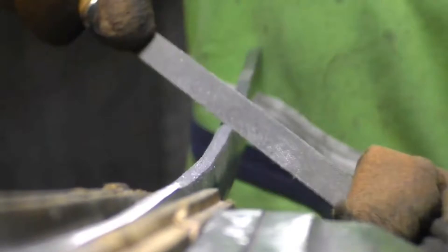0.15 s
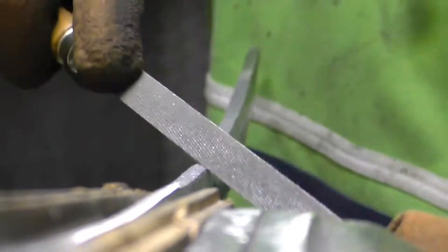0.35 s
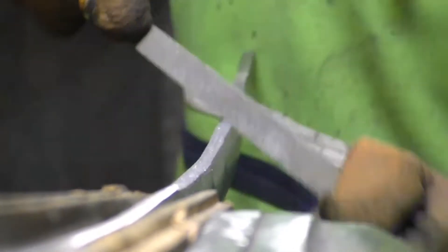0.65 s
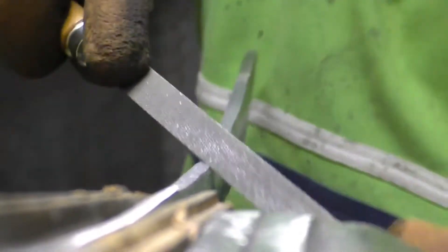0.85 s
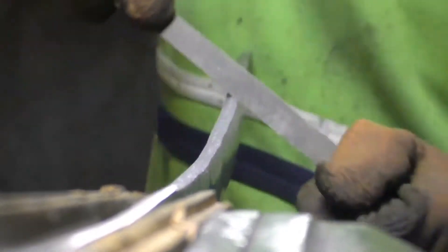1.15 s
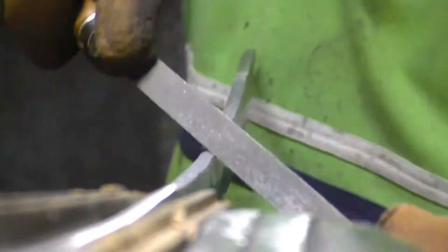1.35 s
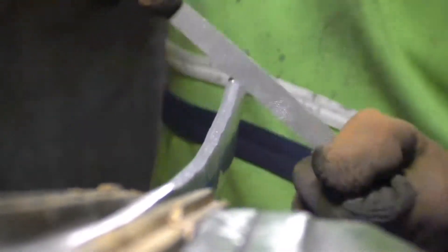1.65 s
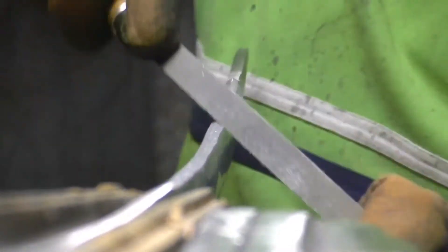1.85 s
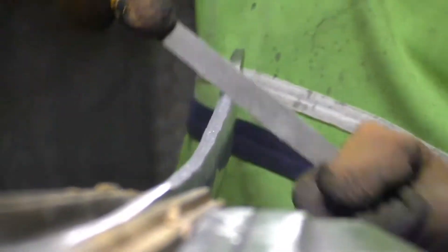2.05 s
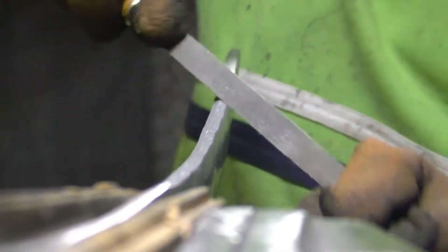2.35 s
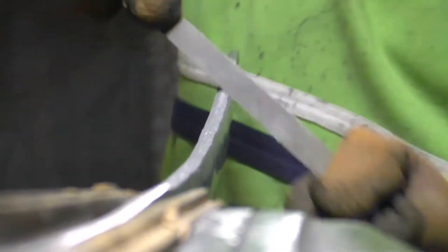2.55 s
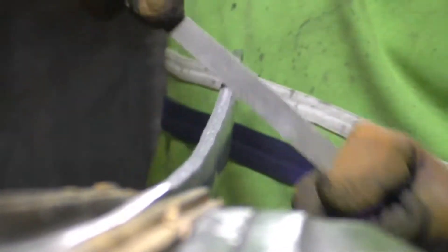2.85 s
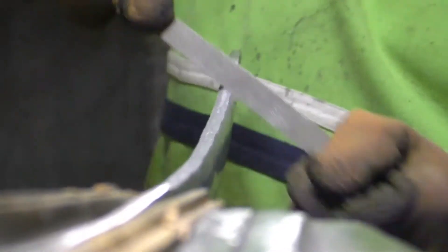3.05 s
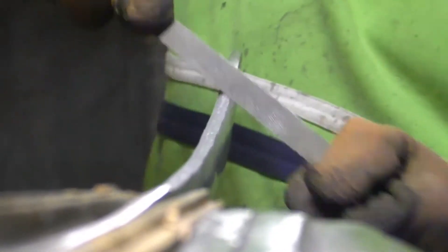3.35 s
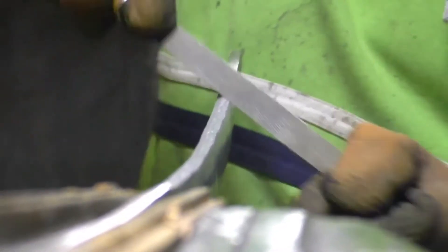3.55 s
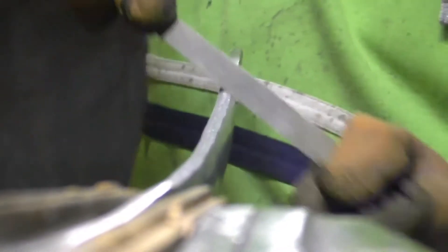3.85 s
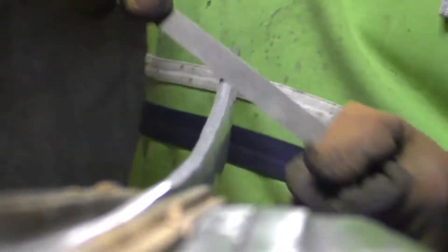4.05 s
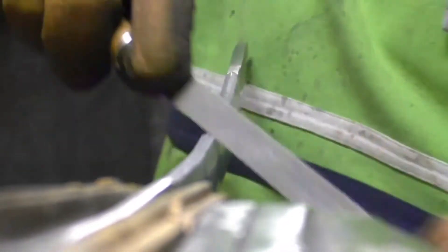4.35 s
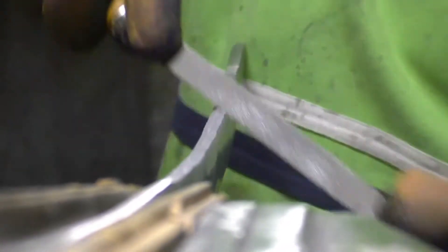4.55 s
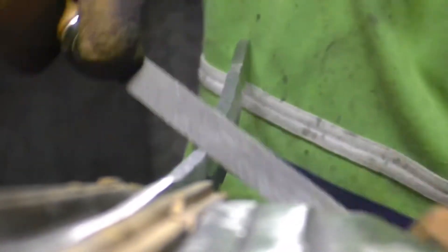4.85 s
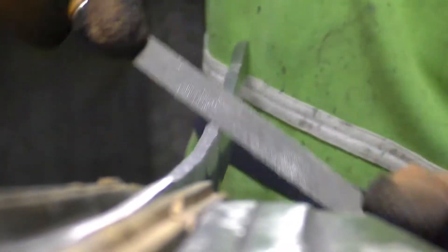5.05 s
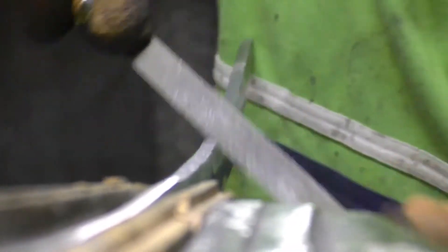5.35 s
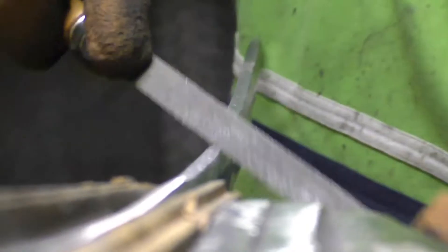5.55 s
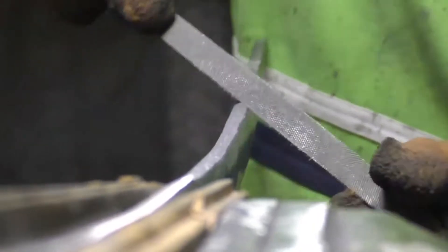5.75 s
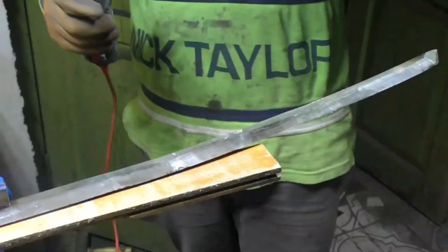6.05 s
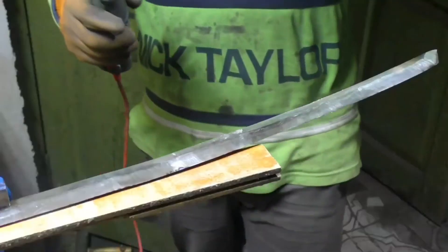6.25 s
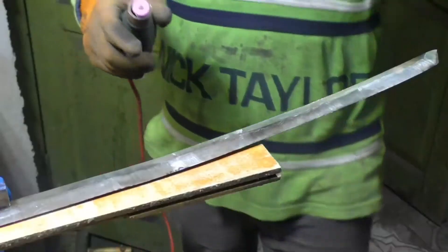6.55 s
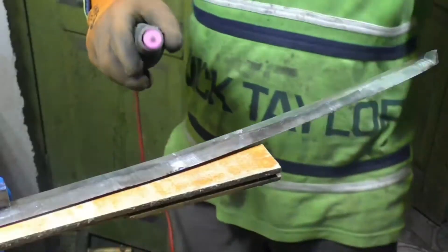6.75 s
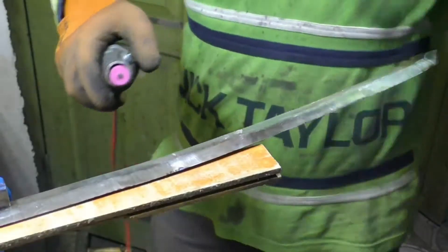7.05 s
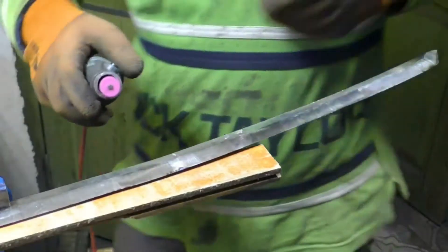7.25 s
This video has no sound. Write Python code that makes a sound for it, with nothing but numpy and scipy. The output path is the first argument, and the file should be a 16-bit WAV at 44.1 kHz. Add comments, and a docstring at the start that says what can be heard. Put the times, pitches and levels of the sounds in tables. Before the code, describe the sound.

From 0 to about 5.9 seconds, a hand file works close by on the tip of a clamped steel blade in a small workshop. Each stroke swells and dips with gritty chatter, bright metallic ringing around two to four kilohertz and a dry rasp above. Until about 2 seconds there are roughly four strokes a second; from 2.2 to 4.2 they become quick, short and duller, about six a second; then long, fuller strokes return. Brief squawks and squeaks poke out, over a woody bench hum, occasional booms and soft thuds. At 5.94 the filing stops abruptly and a handheld rotary grinder takes over, running free. Its shrill whine climbs until about 6.8, swelling near 6.2 and 6.6, with rough bearing tones and throbbing air and brush hiss. It then holds steady, the hiss thinning, the whine strengthening again towards the end at 7.4. Short reflections, stereo leaning slightly left.

```python
"""In a small workshop, heard close by in stereo, a hand file goes to and fro over the tip of a clamped steel
blade: chips and chatter of the teeth drive the steel's resonances, with rasping noise and brief squawks.
The strokes turn quick and short in the middle, then long again, over a humming bench and soft thuds.
Then, abruptly, a handheld rotary grinder runs free, whining up to speed as it is carried to the bench:
tones at multiples of its shaft speed, bearing tones beside them, and throbbing noise of air and brushes."""
import sys
import numpy as np
from scipy import signal
from scipy.fft import rfft, irfft, next_fast_len
from scipy.io import wavfile
from scipy.ndimage import uniform_filter1d

SR = 44100
rng = np.random.default_rng(int(sys.argv[2]) if len(sys.argv) > 2 else 0)


def generate_wav(sig):
    """Save sig (samples, or channels by samples) to the path in sys.argv[1] as 16-bit PCM at SR."""
    pcm = np.round(np.clip(np.atleast_2d(sig).T, -1, 1) * 32767).astype(np.int16)
    wavfile.write(sys.argv[1], SR, pcm)


N = 326340
TIME = np.arange(N) / SR  # s
FILE_END_S, GRINDER_START_S = 5.931, 5.941
GAP_DB = -30.5  # level of the filing in the brief gap at the cut to the grinder

# Levels in the tables are relative.
# Spectrum of the steady background: (frequency [Hz], density [dB per Hz])
FLOOR_COLOUR = [(25, -19), (60, -10), (150, -20), (400, 0), (1500, 17), (15000, -29)]
FLOOR_DB = -70
# Soft low thuds: (time [s], peak level [dB])
THUDS = [(1.574, -48), (3.089, -52), (3.609, -44), (4.274, -43), (4.374, -40), (4.609, -47), (4.849, -59),
         (5.409, -59), (5.674, -55), (6.609, -54)]
# Stereo balance: (frequency [Hz], left over right [dB])
BALANCE = [(40, -2), (150, 3), (1000, 2.5), (3000, 2.9), (12000, 3)]
CUTOFF_HZ = 15750

# Strokes of the file, each lasting until the next: (start [s], share of the stroke at which it is fastest [0-1],
# sharpness of its swell [power], extra level at the turn before it [dB], low modes [dB], high modes [dB],
# rasp [dB], bench [dB], level passing from low to high modes along the stroke [dB],
# low pitch driven hardest [Hz], high pitch driven hardest at mid-stroke [Hz], scale of the high one's glide [Hz])
STROKES = [(-0.05, 0.43, 1.7, 0, -23.5, -12, -26.5, -74, 8, 2140, 3470.0, 612),
           (0.203, 0.47, 2.6, 8.5, -14.5, -12.5, -24.0, -53, 10, 2250, 3620.0, -260.0),
           (0.412, 0.34, 1.7, -2.0, -15, -12.5, -24, -51, 2, 1980, 3620.0, 327),
           (0.677, 0.36, 1.3, -4.5, -17.0, -12.5, -26.5, -46.5, 11, 2300, 3480.0, 715),
           (0.91, 0.48, 1.5, 1.0, -17, -14, -27, -53, 0.0, 2170, 3690.0, 0.0),
           (1.2, 0.49, 1.3, 0.0, -18, -16, -31.5, -44.5, 2.5, 2044, 3550.0, 432.5),
           (1.445, 0.32, 2.24, -1.5, -15.5, -13.5, -26.5, -51, 3.5, 2020, 3490.0, -140.0),
           (1.74, 0.52, 2.7, -3, -15.5, -15, -31.5, -40.5, -5, 1968, 3750.0, -820.0),
           (1.988, 0.42, 2.04, 0, -15.5, -13, -28.5, -52, 12, 2150, 3590.0, 159),
           (2.237, 0.49, 2.1, -2, -19.5, -18, -33, -42, 10, 2330, 3890.0, 267),
           (2.402, 0.46, 2.06, 3.5, -14.5, -16.0, -31, -44, 10, 1920, 3430.0, -1190.0),
           (2.559, 0.48, 2.2, 3.5, -16, -14, -29.5, -43.5, 5, 2290, 3910.0, 740.0),
           (2.714, 0.48, 1.28, -1.0, -18, -17, -32, -45.0, 13, 1910, 3500.0, -1080.0),
           (2.883, 0.51, 1.87, 2.5, -15.5, -13.5, -25, -50, 2, 2190, 3950.0, 800.0),
           (3.041, 0.32, 1.53, 4.5, -18, -15, -28.5, -40, 14, 1970, 3740.0, -1420.0),
           (3.202, 0.44, 2.4, 4, -19.5, -12.5, -29, -44, 20, 2400, 3760.0, -370.0),
           (3.357, 0.53, 2.05, 2, -18.5, -14, -29, -44, 6, 2200, 3520.0, -1680.0),
           (3.512, 0.43, 2.17, 0.5, -13.5, -10, -24.5, -43.5, 14, 2330, 3820.0, 951.5),
           (3.684, 0.45, 1.84, 6.5, -15.5, -15.5, -26, -44, 19, 1930, 3480.0, -1180.0),
           (3.848, 0.47, 1.4, 1.5, -16.5, -14, -26.5, -48, 9, 2210, 3840.0, 917),
           (4.025, 0.33, 1.44, 5.5, -19, -12.5, -26.5, -43.5, 11, 2000, 3660.0, -1640.0),
           (4.194, 0.3, 0.98, -4.5, -14, -12.5, -24.5, -45.0, 3, 2290, 3680.0, 488),
           (4.484, 0.42, 1.66, 3.5, -13, -13, -27, -46, 0.5, 1902, 3890.0, -560.0),
           (4.742, 0.52, 1.42, 0.5, -16.5, -12.5, -24, -48.0, 4, 2150, 3450.0, 433.5),
           (5.0, 0.4, 1.4, -2.5, -18.5, -19, -25.5, -48.5, 0, 2166, 3610.0, 184.5),
           (5.271, 0.46, 1.7, 3, -15.0, -11.5, -24.5, -45.5, 3, 2102, 3570.0, 125),
           (5.535, 0.47, 1.27, 4.5, -17, -12, -24.0, -45, 1, 2076, 3560.0, 63),
           (5.802, 0.56, 1.12, -0.5, -12.5, -15.5, -28.5, -41.5, 7, 2048, 3750.0, 309)]
LAST_TURN_S = 6.04  # where the last stroke would turn round
# Share of quick, short strokes near the tip: (time [s], share [0-1])
QUICK_SHARE = [(1.9, 0), (2.4, 1), (4.0, 1), (4.7, 0)]
# How each layer answers the file:
# (level while the file turns round [dB], power of its drive, gain from start to end of a stroke [dB])
LOW_LAW = (-35.5, 1, 12.3)
HIGH_LAW = (-41.5, 1.094, 0.27)
RASP_LAW = (-52.5, 1.32, 3.1)
BENCH_LAW = (-57, 0.19, 2.5)
# The hand briefly bears down on the file (+) or eases off (-): (time [s], pressure gain [dB])
SHOVES = [(.015, -3), (.05, 2), (0.263, 2), (.365, 2.5), (.645, 7.5), (.715, -1.5), (.83, -4), (0.864, 4),
          (1.125, -10), (1.285, 5), (1.395, 3.5), (1.689, 8.5), (1.79, 0.5), (1.925, 2), (2.765, -0.5),
          (3.16, 3.5), (3.47, 2.5), (3.728, 3), (3.925, 1.5), (4.225, -2), (4.405, 0), (4.455, -5),
          (5.315, -2.5), (5.338, 2.5)]
SHOVE_S, BOOM_S = 0.013, 0.049  # half lengths

# Modes of the wooden clamp and bench: (frequency [Hz], width [Hz], level [dB])
BENCH_MODES = [(189.8, 14, 2.5), (254, 15, -5.5), (343, 46, -9), (413, 46, -9.5), (452, 12, 3),
               (531, 56, -15), (675, 82, -13.5)]
# Its lowest, middle and upper modes: (level under long strokes [dB], level under quick ones [dB])
BENCH_MIX = [(-11.5, -10), (-5.5, -11.5), (-3.5, -3)]
# The clamp's lowest mode booms when the blade is pushed hard: (time [s], level [dB])
BOOMS = [(.18, -46), (.99, -44), (2.0, -42), (2.5, -44.5), (2.92, -50), (3.41, -41), (3.76, -58),
         (4.15, -51), (4.6, -46), (4.69, -38), (5.88, -48)]

# Main whine, the third shaft order, which swells and fades as the tool is moved: (time [s], level [dB])
WHINE = [(5.95, -26), (6.08, -27), (6.17, -19.5), (6.22, -10), (6.29, -11.5), (6.39, -24.5), (6.48, -17.5),
         (6.53, -18), (6.585, -9), (6.72, -15.5), (6.87, -23.5), (7.0, -19), (7.15, -19), (7.39, -10.5)]
WHINE_USUAL_DB = -16.5
# The shaft's own hum, and its octave: (time [s], level [dB])
HUM = [(5.95, -43.5), (6.05, -28), (6.15, -43.5), (6.37, -32.5), (6.54, -39), (6.85, -28.5), (7.39, -27)]
OCTAVE = [(5.95, -33), (6.06, -31), (6.22, -19), (6.35, -25.5), (6.56, -19), (7.0, -40), (7.39, -32.5)]
# Rotary grinder running up: (time [s], speed [revolutions per s])
SPEED = [(5.94, 510), (6.0, 522), (6.05, 533), (6.1, 540), (6.2, 551), (6.3, 562), (6.4, 569), (6.5, 576),
         (6.6, 581), (6.8, 585), (7.0, 583), (7.2, 581), (7.4, 581.5)]
# The shaft shudders while it runs up: (time [s], phase wobble, less below the third order [rad])
SHUDDER = [(5.95, 1.1), (6.06, .7), (6.16, .3), (6.2, .8), (6.25, .3), (6.55, .25), (6.8, .08)]
# Orders that follow the whine:
# (shaft order, level while speeding up [dB], level at full speed [dB], share of the whine's swing)
UPPER_ORDERS = [(4, -25, -21.5, 0.037), (5, -49, -24.5, 0.84), (6, -35.5, -29.5, 0.089), (8, -47, -41, 1.7)]
# The upper orders pass to their full-speed levels between: (start [s], end [s])
EMERGE_S = (6.4, 6.56)
# Weaker overtones: (shaft order, level [dB])
OVERTONES = [(7, -41), (8, -38), (9, -42), (10, -48), (13, -50), (16, -53.5), (20, -60), (26, -67)]
# Ball-bearing tones beside the orders:
# (shaft order, cage steps, level while speeding up [dB], level at full speed [dB])
BEARINGS = [(2, 1, -34, -50), (3, -2, -33, -58), (3, -1, -34, -48), (3, 1, -25, -43), (4, -1, -39, -47),
            (4, 1, -28.5, -27.5), (5, -1, -44, -42), (5, 1, -33, -40), (6, -1, -56, -38),
            (6, 1, -37.5, -41), (6, 2, -44, -37)]
CAGE = .195  # the bearing cage throws sidebands this many orders apart
OVERTONES_FOLLOW, BEARINGS_FOLLOW = 0.32, -0.59  # shares of the whine's swing; bearings' at full speed
# Cooling air and brushes: (time [s], air level [dB], brush hiss level [dB])
AIR = [(5.96, -26, -18.5), (6.39, -29, -26), (6.488, -26.5, -23.5), (6.736, -26, -22.5),
       (6.752, -28, -24.5), (7.13, -31, -31.5), (7.198, -31.5, -29), (7.298, -32, -29), (7.39, -35, -40)]
# Their colour: (frequency [Hz], density [dB per Hz])
AIR_COLOUR = [(100, -47), (400, -30), (550, -21), (700, -21.5), (920, -21), (1100, -5.5), (1400, -3),
              (1700, 2.5), (2300, 3.5), (3200, -3), (5200, -6), (6500, -12.5), (10000, -9), (15500, -17.5)]

# Brief squawks and bright patches in the filing, each round one pitch:
# (time [s], level [dB], pitch [Hz], length [s])
SQUAWKS = [(.045, -11.5, 3140, 0.03), (.263, -13, 1809, 0.022), (.757, -3.5, 3010, 0.0089),
           (1.008, -8.5, 3750, 0.0094), (1.062, -12, 2239, 0.026), (1.324, -7, 2950, 0.0088),
           (1.586, -5, 3024, 0.0079), (2.502, -15, 3101, 0.021), (2.766, -11, 1760, 0.014),
           (2.818, -10.5, 1850, 0.0093), (2.943, -13, 2153, 0.028), (2.985, -12, 4075, 0.016),
           (3.092, -8, 1790, 0.0063), (3.28, -17, 4565, 0.027), (3.467, -16.5, 3445, 0.032),
           (3.615, -10, 4130, 0.02), (3.801, -13.5, 3531, 0.023), (4.124, -9.5, 3094, .016),
           (4.271, -14, 4651, .025), (4.275, -11, 3494, 0.016), (4.383, -10.5, 1773, 0.028),
           (4.59, -7.5, 1848, 0.048), (4.818, -19, 1723, 0.036), (4.85, -9, 2960, 0.012),
           (5.187, -7.5, 2100, 0.0033), (5.333, -9, 3110, 0.004), (5.483, -15, 4651, 0.019),
           (5.712, -12.5, 2412, 0.027), (5.922, -11.5, 3950, .014)]
# Modes of blade and file: (frequency [Hz], width [Hz], level [dB])
STEEL_MODES = [(1120, 126, -19), (1252, 14, 1.5), (1738.7, 57, 4.5), (1882, 26, 8), (1990, 25, 5),
               (2156, 32.5, 8), (2416.5, 130, 0.5), (2580, 62, 4), (3003, 74, -1.5), (3121, 57, 4),
               (3166.5, 99, -5.5), (3530, 41, -3), (3740, 170, -10.5), (3873, 23, 1.5), (4046, 32, -5),
               (4080, 34, 2), (4510, 61, -11.5), (4520, 35, 6), (4598, 50, -2), (4712, 136, -6),
               (4870, 250, -17), (5200, 166, -10.5), (5630, 113, -16), (6026, 45, -8), (6270, 82, -32.5),
               (7090, 200, -16.5), (8680, 79, -23.5), (9200, 61, -21.5), (11150, 85, -21),
               (12800, 150, -30), (12800, 100, -35)]
# The dense weak modes between them: (frequency [Hz], density [dB per Hz])
SCRAPE_COLOUR = [(410, -63), (700, -21.5), (1190, -1), (1540, -5), (1800, 4), (2770, -3), (3070, -9),
                 (3360, -14), (3920, -4), (4640, -2), (4950, -34), (6260, -9), (6760, -22), (11500, -22.5),
                 (15500, -30.5)]
# How far the high modes near the driven pitch stand out: (on long strokes [dB], on quick ones [dB])
HIGH_FOCUS_DB = (8, 6)
# The driven pitch slides over in mid-stroke: share of the glide reached each way, share of the stroke it takes
GLIDE_REACH, GLIDE_WIDTH = .33, .2
# Long strokes sound fuller, the quick ones near the tip duller: (frequency [Hz], gain [dB])
LONG_COLOUR = [(600, 7), (1150, 3.5), (1700, -1), (5000, -0.5), (14000, 2)]
QUICK_COLOUR = [(1150, 1), (1700, -1), (4200, -1), (5000, 2), (6500, 1.5), (10000, -0.5), (14000, -2)]


def from_db(db):
    """Amplitude factor of a level in dB."""
    return 10 ** (np.asarray(db) / 20)


def rms_one(x):
    """Scale to an RMS of 1."""
    return x / np.sqrt(np.mean(x ** 2) + 1e-20)


def in_time(rows):
    """Each column of a curve table at every sample."""
    s, *columns = np.transpose(rows)
    return [np.interp(TIME, s, column) for column in columns]


def coloured(x, points):
    """Filter by a (frequency [Hz], gain [dB]) curve, straight over log frequency."""
    hz, db = np.transpose(points)
    size = next_fast_len(N + 4096)
    bins = np.maximum(np.fft.rfftfreq(size, 1 / SR), 1)
    gain = from_db(np.interp(np.log(bins), np.log(hz), db))
    return irfft(rfft(x, size) * gain, size)[:N]


def passed(x, hz, kind, order=4):
    """Butterworth filter."""
    sos = signal.butter(order, hz, kind, fs=SR, output="sos")
    return signal.sosfilt(sos, x + 1e-18)


def drift(rate):
    """Random wandering of RMS 1, with `rate` fresh values per second joined by lines."""
    return rms_one(np.interp(TIME * rate, np.arange(N // 8), rng.standard_normal(N // 8)))


def noise():
    """White noise."""
    return rng.standard_normal(N)


def resonate(x, hz, width_hz):
    """A resonance of gain 1 at its top."""
    r = np.exp(-np.pi * width_hz / SR)
    feedback = [1, -2 * r * np.cos(2 * np.pi * hz / SR), r * r]
    return signal.lfilter(np.array([1, 0, -1]) * (1 - r * r) / 2, feedback, x + 1e-18)


def body(x, modes):
    """A solid body as parallel resonances of alternating sign."""
    return sum((-1) ** k * from_db(db) * resonate(x, hz, width) for k, (hz, width, db) in enumerate(modes))


def evened(x, seconds):
    """Hold the slow level at 1 and keep the fine grain."""
    power = uniform_filter1d(x ** 2, max(int(seconds * SR), 8))
    return x / np.sqrt(np.maximum(power, 1e-12))


def swells(rows, half_s):
    """Sum of bell-shaped swells, one for each (time [s], height)."""
    out = np.zeros(N)
    for s, height in rows:
        near = slice(*np.searchsorted(TIME, [s - 4 * half_s, s + 4 * half_s]))
        out[near] += height * np.exp(-((TIME[near] - s) / half_s) ** 2)
    return out


def db_swells(rows, half_s):
    """Swells whose heights are given in dB."""
    return swells([(s, from_db(db)) for s, db in rows], half_s)


def chips(per_s, spread_db):
    """Tiny fractures at random moments and of uneven size."""
    sizes = from_db(spread_db * np.minimum(rng.exponential(1, N), 5)) * rng.choice([-1, 1], N)
    return rms_one(sizes * (rng.random(N) < per_s / SR))


def patchy(x, edges, patchy_db, centre_hz=None, focus_db=0):
    """Neighbouring bands swell and fade on their own; those near the centre gain."""
    out, spectrum, bins = 0, rfft(x), np.fft.rfftfreq(N, 1 / SR)
    for hz, window in zip(edges, np.eye(len(edges))):
        db = patchy_db * drift(28)
        if centre_hz is not None:
            db = db + focus_db * np.exp(-(np.log(hz / centre_hz) / 0.25) ** 2)
        band = irfft(spectrum * np.interp(bins, edges, window), N)  # overlapping triangles
        out = out + from_db(db) * band
    return out


def background():
    """Steady coloured noise behind everything."""
    return from_db(FLOOR_DB) * rms_one(coloured(noise(), FLOOR_COLOUR))


def thuds_and_rumble():
    """Low-band noise: soft thuds, and an uneven rumble that is weaker after the filing."""
    thuds = from_db(-5) * db_swells(THUDS, half_s=0.014)
    rumble = from_db(np.where(TIME < FILE_END_S, -66, -73) + 4 * drift(16))
    return (thuds + rumble) * rms_one(passed(noise(), [28, 170], "band", order=2))


def workshop(x, t60, wet_db, near_db):
    """Early reflections off the bench, alike at both sides, and a short diffuse tail, different at each."""
    t = TIME[:SR // 2]
    decay = from_db(-60 * t / np.array([[.12], [t60], [t60]]))
    tails = rng.standard_normal((3, len(t))) * decay * (t > .003)
    tails /= np.sqrt(np.sum(tails ** 2, axis=1, keepdims=True))
    response = from_db(near_db) * tails[0] + from_db(wet_db) * tails[1:]
    return x + signal.fftconvolve(x[None], response, axes=1)[:, :N]


def stroke_motion():
    """Which stroke is under way, how far along (0-1), and its drive: a half sine leaning early or late."""
    starts, fastest, sharpness = np.transpose(STROKES)[:3]
    turns = np.append(starts, LAST_TURN_S)
    which = np.clip(np.searchsorted(turns, TIME) - 1, 0, len(starts) - 1)
    along = np.clip((TIME - turns[which]) / np.diff(turns)[which], 0, 1)
    top = fastest[which]
    speed = np.sin(np.pi / 2 * np.minimum(along / top, (1 - along) / (1 - top)))
    return which, along, speed ** sharpness[which]


def stroke_gain(motion, stroke_db, law, shift_db=0):
    """A layer's gain: a little at the turns, swelling with the drive to the stroke's own level."""
    which, along, drive = motion
    turn_db, power, lean_db = law
    starts, _, _, extra_db = np.transpose(STROKES)[:4]
    swell = from_db(stroke_db[which] + (lean_db + shift_db) * (along - .5)) * drive ** power
    return from_db(turn_db + np.interp(TIME, starts, extra_db)) + swell


def bench(motion):
    """The wooden clamp and bench hum with the strokes; now and then the lowest mode booms."""
    shake = chips(per_s=1500, spread_db=0.5)
    lowest = passed(body(shake, BENCH_MODES[:1]), [165, 225], "band", order=2)
    middle = passed(body(shake, BENCH_MODES[1:4]), 270, "high")
    upper = passed(body(shake, BENCH_MODES[4:]), 390, "high")
    quick, = in_time(QUICK_SHARE)
    hum = 0
    for (long_db, quick_db), group in zip(BENCH_MIX, [lowest, middle, upper]):
        db = long_db + quick * (quick_db - long_db) + 2.0 * drift(9)
        hum = hum + from_db(db) * evened(group, seconds=0.092)
    booming = from_db(-5.0) * db_swells(BOOMS, BOOM_S) * evened(lowest, seconds=.05)
    return stroke_gain(motion, np.transpose(STROKES)[7], BENCH_LAW) * hum + booming


def air_and_brushes(turn):
    """Turbulent noise of the fan and hiss of the brushes, throbbing once a turn."""
    air_db, hiss_db = in_time(AIR)
    rush = rms_one(coloured(noise() * (1 + 0.5 * np.sin(turn)), AIR_COLOUR))
    rush = patchy(rush, np.linspace(900, 15000, num=24), patchy_db=2.0)
    air = from_db(air_db + 4.5) * rms_one(passed(rush, 6660, "low"))
    hiss = from_db(hiss_db - 7.0) * rms_one(passed(rush, 4500, "high"))
    # faint low rush of the vents
    vent = from_db(-69) * rms_one(passed(noise(), [130, 420], "band", order=2))
    return air + hiss + vent


def random_phase():
    """A random starting phase in radians."""
    return rng.uniform(0, 2 * np.pi)


def shaft_orders(turn, swing_db):
    """Tones at whole multiples of the shaft speed, their phases shaken by its shudder."""
    hum_db, octave_db, whine_db, shudder = (in_time(curve)[0] for curve in (HUM, OCTAVE, WHINE, SHUDDER))
    emerged = np.interp(TIME, EMERGE_S, [0, 1])
    orders = [(1, hum_db), (2, octave_db), (3, whine_db)]
    for order, early_db, late_db, share in UPPER_ORDERS:
        orders.append((order, early_db + emerged * (late_db - early_db) + share * swing_db))
    tones = 0
    for order, db in orders:
        wobble = shudder * min(order / 3, 1) * drift(170) + random_phase()
        tones = tones + from_db(db + 0.55 * drift(70)) * np.sin(order * turn + wobble)
    return tones


def overtones(turn, swing_db, settled, waking_db):
    """Weak high orders, each with one weaker cage sideband."""
    tones = 0
    for order in range(7, 27):
        db = np.interp(order, *np.transpose(OVERTONES)) + waking_db - 1.0 * (1 - settled)
        db = db + OVERTONES_FOLLOW * swing_db + 3.2 * drift(7) - 2.2
        for steps, side_db in [(0, 4), (1, -4)]:
            gain = from_db(db + side_db + 2.0 * drift(9))
            tones = tones + gain * np.sin((order + steps * CAGE) * turn + random_phase())
    return tones


def bearings(turn, swing_db, settled, waking_db):
    """Ball-bearing tones, whole cage steps away from the shaft orders."""
    tones = 0
    for order, steps, early_db, late_db in BEARINGS:
        slip = 0.46 * drift(35) + random_phase()  # the balls skid a little
        db = early_db + settled * (late_db - early_db + BEARINGS_FOLLOW * swing_db)
        gain = from_db(db + waking_db + 5.4 * drift(12))
        tones = tones + gain * np.sin((order + steps * CAGE) * turn + slip)
    return tones


def whine(turn):
    """Shaft orders, overtones and bearing tones, all locked to the turning shaft."""
    swing_db = in_time(WHINE)[0] - WHINE_USUAL_DB
    settled = np.interp(TIME, [6.55, 6.85], [0, 1])
    # the bearings sing out only with speed
    waking_db = np.interp(TIME, [5.95, 6.2, 6.45], [-10, -3, 0])
    tones = shaft_orders(turn, swing_db) + overtones(turn, swing_db, settled, waking_db)
    return np.sqrt(2) * (tones + bearings(turn, swing_db, settled, waking_db))


def grinder():
    """The shaft's angle, slightly unsteady in speed, drives the whine and the throb of air and brushes."""
    speed = in_time(SPEED)[0] * (1 + 0.000826 * drift(60))
    turn = 2 * np.pi * np.cumsum(speed) / SR
    return whine(turn) + air_and_brushes(turn)


def squawks():
    """Brief bursts, each a wavering tone round one pitch, with a weak octave and a spray of chips."""
    out, wobble = np.zeros(N), drift(400)
    spray = passed(chips(per_s=8000, spread_db=4), [1200, 7000], "band", order=1)
    for s, db, hz, length in SQUAWKS:
        near = np.abs(TIME - s) < 2 * length
        t = TIME[near] - s
        phase = 2 * np.pi * hz * t + 0.68 * wobble[near]
        squawk = np.sin(phase) + 0.047 * np.sin(2 * phase) + 0.13 * spray[near]
        out[near] += from_db(db) * np.exp(-(2 * t / length) ** 2) * squawk
    return np.sqrt(2) * out


def dense_modes(x, t60):
    """Countless close, briefly ringing modes, as a decaying noise response."""
    t = TIME[:SR // 8]
    response = rng.standard_normal(len(t)) * from_db(-60 * t / t60)
    return rms_one(signal.fftconvolve(x, response)[:N])


def hand_pressure():
    """Gain from the hand's uneven pressure on the file."""
    return from_db(swells(SHOVES, SHOVE_S) + 0.29 * drift(25))


def driven_steel(high_hz, judder):
    """Teeth tear chips and chatter at a wavering pitch; the steel rings with both."""
    cutting = chips(per_s=9000, spread_db=3.0) * judder
    chatter = np.sin(2 * np.pi * np.cumsum(high_hz + 380 * drift(900)) / SR) * judder
    force = cutting + from_db(-3.5) * chatter
    return rms_one(body(force, STEEL_MODES)) + from_db(-3.5) * rms_one(coloured(force, SCRAPE_COLOUR))


def filing(motion):
    """Low and high ringing and rasp of the driven steel, each swelling with the strokes, plus the squawks."""
    which, along, _ = motion
    low_db, high_db, rasp_db, _, shift_db, low_hz, high_hz, glide_hz = np.transpose(STROKES)[4:]
    quick, = in_time(QUICK_SHARE)
    low_hz = low_hz[which]
    # the contact travels along the file
    glide = GLIDE_REACH * np.tanh((along - .5) / GLIDE_WIDTH)
    high_hz = high_hz[which] + glide_hz[which] * glide
    judder = from_db(1.9 * drift(220) + 1.0 * drift(50))  # rows of teeth bite unevenly
    steel = driven_steel(high_hz, judder)

    low = passed(steel, [850, 2700], "band")
    low = patchy(low, np.geomspace(900, 2600, num=8), patchy_db=2.2, centre_hz=low_hz, focus_db=7)
    high = passed(steel, [2700, 5350], "band", order=5)
    high_focus_db = np.interp(quick, [0, 1], HIGH_FOCUS_DB)
    high = patchy(high, np.geomspace(2750, 4900, num=7), patchy_db=2.2, centre_hz=high_hz,
                  focus_db=high_focus_db)
    treble = rms_one(passed(steel, 5150, "high", order=12))
    treble = treble + .7 * dense_modes(treble, t60=.04) * judder
    rasp = patchy(treble, np.linspace(5000, 15500, num=20), patchy_db=2.6)

    low_gain = stroke_gain(motion, low_db - .8, LOW_LAW, -shift_db[which])
    high_gain = stroke_gain(motion, high_db - .8, HIGH_LAW, shift_db[which])
    rasp_gain = stroke_gain(motion, rasp_db - .6, RASP_LAW)
    bite = from_db(1.0 * drift(130))  # coarse grit shakes the ringing modes
    ringing = bite * (low_gain * evened(low, seconds=0.021) + high_gain * evened(high, seconds=0.044))
    stroke = (ringing + rasp_gain * evened(rasp, seconds=0.021)) * hand_pressure()
    long_part = (1 - quick) * coloured(stroke, LONG_COLOUR)
    quick_part = quick * coloured(stroke, QUICK_COLOUR)
    return long_part + quick_part + squawks()


def scene():
    """Filing, then the grinder, each with its reflections, over the background, balanced left to right."""
    file_on = np.clip((FILE_END_S - TIME) / 0.00057, from_db(GAP_DB), 1) * (TIME < GRINDER_START_S)
    grinder_on = np.clip((TIME - GRINDER_START_S) / 0.0016, 0, 1)
    motion = stroke_motion()
    file_work = workshop(filing(motion) + bench(motion), t60=0.26, wet_db=-25.0, near_db=-7.0)
    grinder_run = workshop(grinder(), t60=.2, wet_db=-30, near_db=-20)
    tools = file_on * file_work + grinder_on * grinder_run
    left, right = tools + background() + thuds_and_rumble()
    left = coloured(left, [(hz, db / 2) for hz, db in BALANCE])
    right = coloured(right, [(hz, -db / 2) for hz, db in BALANCE])
    return np.array([left, right])


def record(dry):
    """The highest peaks are rounded off and the top is cut."""
    rounded = dry / (1 + np.abs(dry) ** 6) ** (1 / 6)
    top_cut = signal.ellip(12, .1, 70, CUTOFF_HZ, fs=SR, output="sos")
    return signal.sosfilt(top_cut, rounded)


dry = scene()
out = record(dry)
generate_wav(out)
```